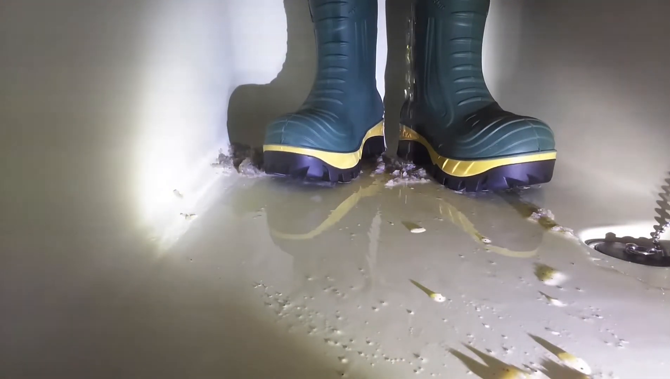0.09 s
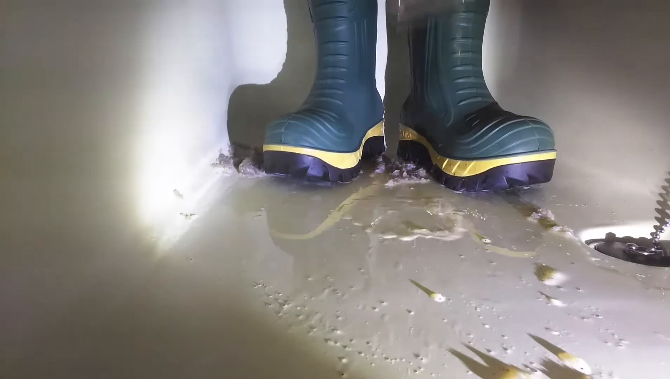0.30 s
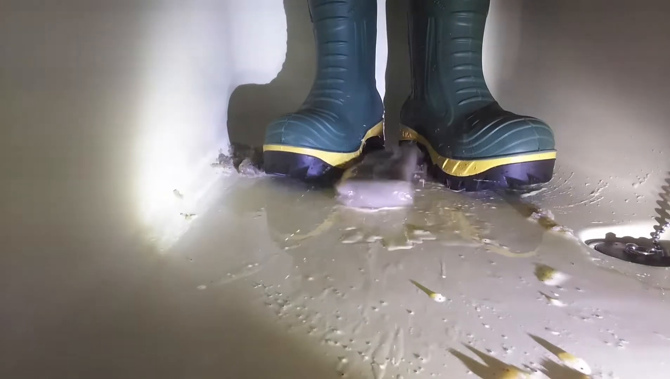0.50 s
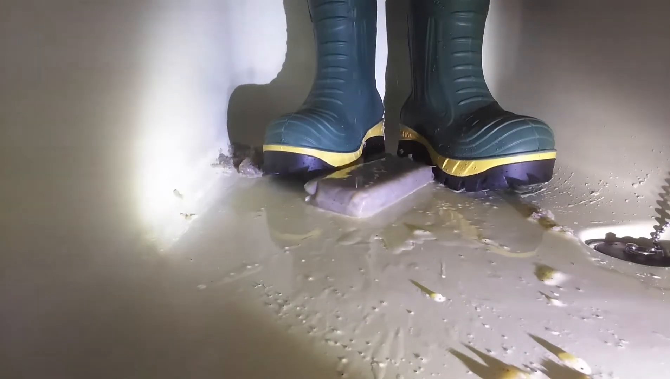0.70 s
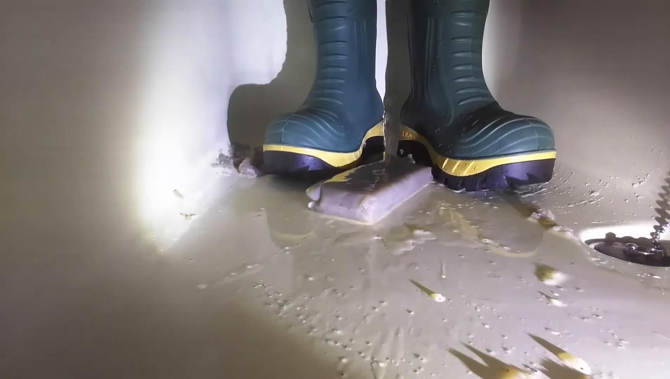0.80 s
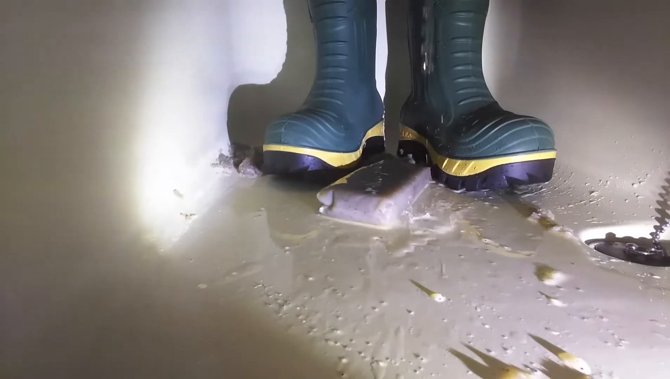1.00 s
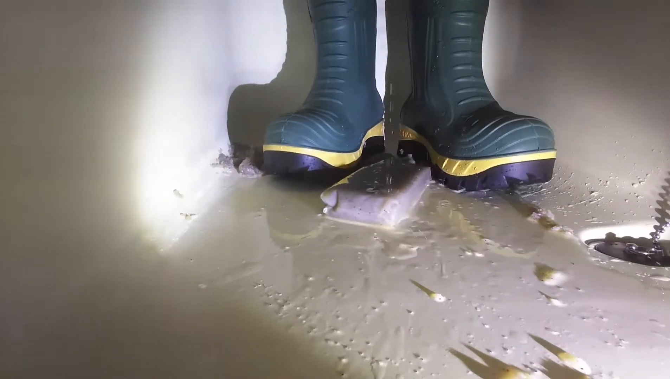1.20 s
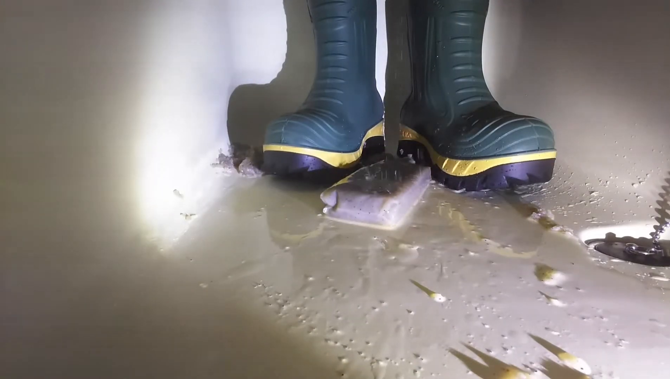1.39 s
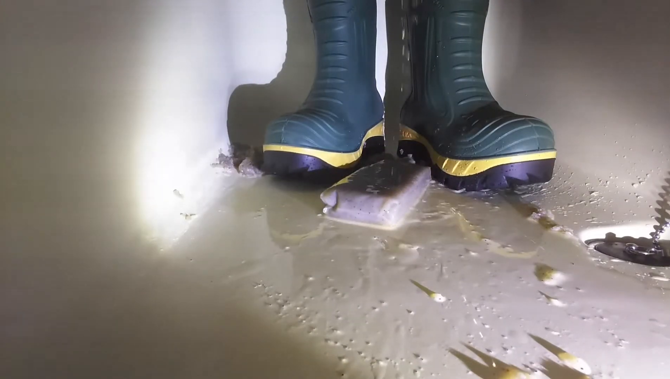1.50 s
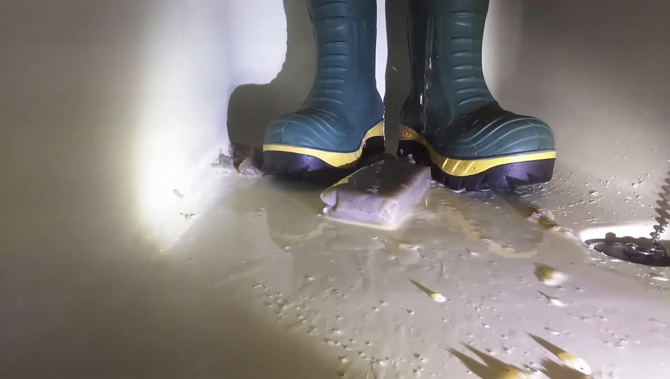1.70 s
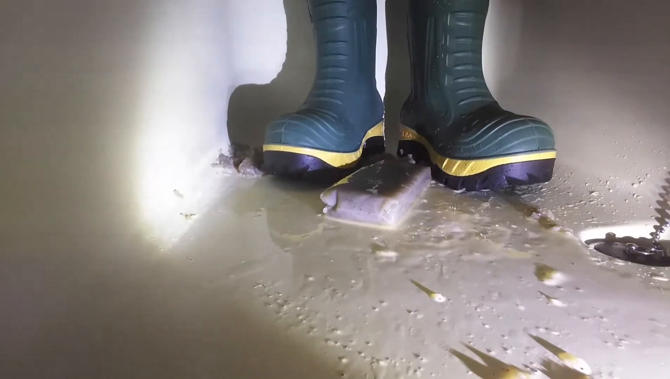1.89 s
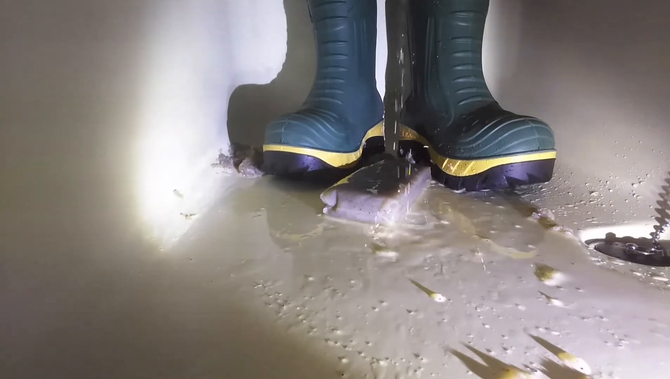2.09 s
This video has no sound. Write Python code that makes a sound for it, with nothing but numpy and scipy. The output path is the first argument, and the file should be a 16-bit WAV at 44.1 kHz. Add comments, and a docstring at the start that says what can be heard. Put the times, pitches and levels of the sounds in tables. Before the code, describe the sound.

After a near-quiet start, a wet lump lands in a quick cluster of hollow thuds, splats and squelching, then settles into sparse dribbles and tiny pops, heard very close from the tub floor in a reverberant bathroom.

```python
"""In a bathtub in a small tiled room, soft wet food drops between rubber boots.
Lumps thud on the thin tub floor and ring its modes; a block tumbles as a lumpy rolling force on the same modes.
Wet splats are crackly noise bursts, popping bubbles are short rising tones, squelching is a swarm of tiny rings.
Tub walls and room answer. Two close microphone ports listen from the tub floor, the right one peaking
in the treble, over a quiet room tone."""
import sys
import numpy as np
from scipy import signal
from scipy.fft import rfft, irfft, next_fast_len
from scipy.io import wavfile
from scipy.ndimage import map_coordinates

SR = 44100
rng = np.random.default_rng(int(sys.argv[2]) if len(sys.argv) > 2 else 0)


def to_wav(s):
    """Save 16-bit WAV."""
    ch = np.atleast_2d(s).T  # columns
    pcm = np.round(np.clip(ch, -1, 1) * 32767)  # PCM
    wavfile.write(sys.argv[1], SR, pcm.astype(np.int16))


def level_to_linear(level):
    """Convert decibel levels to linear amplitude factors, elementwise."""
    exponent = np.asarray(level, float) / 20
    return 10 ** exponent


N = 92610  # length in samples, 2.1 s

BOOM_UNDER_HZ = 130  # the tub's lowest modes lie below this
ROOM_TUB_DB, ROOM_WET_DB = -12, 3.5  # room gain for tub sounds and for wet sounds


def unit(x):
    """Scale to rms 1."""
    return x / np.sqrt(np.mean(x ** 2) + 1e-20)


def along(points, hz, order=1):
    """Read one column of (Hz, ..) points on a log frequency axis."""
    columns = np.transpose(points)
    return np.interp(np.log(hz + 1), np.log(columns[0] + 1), columns[order])


def filtered(x, response):
    """Multiply the spectrum of x by a response of frequency."""
    m = next_fast_len(x.shape[-1] + 8192)
    spectrum = rfft(x, m) * response(np.fft.rfftfreq(m, 1 / SR))
    return irfft(spectrum, m)[..., :x.shape[-1]]


def add(out, x, s, pan_db=0):
    """Mix x into out at time s, the left port pan_db above the right."""
    i = min(round(s * SR), N)
    panned = x * level_to_linear([[pan_db / 2], [-pan_db / 2]])
    out[..., i:i + x.shape[-1]] += panned[..., :N - i]


# Lumps landing on the tub floor, close to the ports. Each row: start in seconds, level in dB before
# the shared trim, contact in ms, extra boom of the lowest modes in dB.
LANDINGS = [(0.2195, -18.5, 1.38, -16), (0.2464, -18, 1.42, -1), (0.315, -32, 3.7, -2),
            (0.446, -14, 4.2, 20), (0.47, -12.5, 2.65, 6.5), (0.49, -12, 1.35, 11), (0.503, -22.5, 3.45, 9),
            (0.542, -8.5, 5.6, -6), (0.593, -13, 5.7, 7.5), (.5988, -6, .9, -4), (.611, -14, 0.98, -19),
            (0.621, -16.5, 1.4, 13), (0.677, -22, 1.23, -9), (0.719, -14, 2.87, -9.5), (.775, -25.5, 3, 4),
            (.91, -31.5, 0.55, 11.5), (.921, -39, 1, -14), (0.935, -34, 4.4, 12), (1.081, -30, 1.78, 6),
            (1.141, -29, 1.02, 1), (1.172, -34.5, 0.6, 7), (1.268, -37, 1.6, -2), (1.348, -30, 2.4, -10),
            (1.499, -40, 3.5, 1), (1.526, -30, 2.1, 3.5), (1.638, -29, 3.5, 7.5), (1.7937, -25, 2.06, 5),
            (1.804, -33, 4.8, 5), (1.821, -37, 1.06, 0), (1.86, -24, 1.08, -9), (1.871, -37, 0.68, -5),
            (1.878, -26, 0.99, -11), (1.894, -32, 1.4, -10), (1.922, -37, 1.9, 0), (1.988, -36.5, 2.3, -14),
            (2.086, -23.5, 0.97, -3)]


def thuds():
    """Each soft blow is a smooth push, heard directly and through the ringing of the tub floor."""
    out = np.zeros((2, N))
    trim_db = -6
    for s, db, contact_ms, boom_db in LANDINGS:
        push = np.hanning(max(int(contact_ms * SR / 1000), 4) + 2)
        tap = ring(spread_db=2, boom_db=boom_db)
        blow = signal.fftconvolve(tap, push[None] / push.sum(), axes=1)
        blow[:, :len(push)] += push
        gain = level_to_linear(db + trim_db)
        add(out, gain * blow, s)
        add(out, gain * room(blow.mean(0)[:SR // 3], ROOM_TUB_DB), s)
    return out


# The block tumbling and dribble drumming on the tub floor. Each row: time in seconds, level in dB
# before the shared trim, hardness as gain in dB above 500 Hz.
TUMBLING = [(0.2, -88, -4), (0.216, -50, -6), (0.224, -25, -2.5), (0.342, -24.5, -12), (.372, -27, 1.5),
            (0.422, -36, 4.5), (0.443, -21.5, -5), (0.458, -18.5, 2), (0.574, -25.5, -25),
            (0.601, -19.5, 6.5), (0.898, -52, -20), (0.936, -38, -19), (1.052, -50.5, -1), (1.082, -42, 5),
            (1.184, -31.5, 2.5), (1.322, -47, 5), (1.358, -39.5, 2.5), (1.455, -48.5, -4),
            (1.528, -41.5, 4.5), (1.606, -49, -4), (1.644, -39, 1), (1.786, -45.5, -17), (1.795, -33.5, 8),
            (1.855, -37, 3), (1.866, -40.5, 9.5), (1.93, -39, 3), (2.03, -37, 3.5), (2.1, -30, -8)]


def tumble():
    """A lumpy rolling force wanders between spots of the tub floor; the wet load damps their ring."""
    trim_db, boom_db, hard_over_hz = -6, -5, 500
    force_hz, lumpy_db = 450, 1.5  # corner of the force, random swing of its level
    spots, load_t60_s = 5, 0.12
    s, db, hard_db = np.transpose(TUMBLING)
    lumps = map_coordinates(rng.standard_normal(N // 600 + 4), [np.arange(N) / 600])
    force = filtered(rng.standard_normal(N), lambda hz: 1 / (1 + (hz / force_hz) ** 2))
    force = force * level_to_linear(lumpy_db * lumps)
    damping = level_to_linear(-60 * np.arange(SR // 4) / SR / load_t60_s)
    taps = [ring(spread_db=2)[:, :SR // 4] * damping for _ in range(spots)]
    # 40 random moments at which a new spot is drawn
    moves = N * np.sort(rng.random(40))
    spot = rng.integers(spots, size=41)[np.searchsorted(moves, np.arange(N))]
    roll = np.zeros((2, N))
    for k, tap in enumerate(taps):
        roll += signal.fftconvolve((force * (spot == k))[None], tap, axes=1)[:, :N]
    roll = unit(roll)
    t = np.arange(N) / SR
    deep = filtered(roll, lambda hz: 1 / (1 + (hz / BOOM_UNDER_HZ) ** 8))
    high = filtered(roll, lambda hz: 1 - 1 / (1 + (hz / hard_over_hz) ** 8))
    hardness = level_to_linear(np.interp(t, s, hard_db))
    roll = roll + deep * (level_to_linear(boom_db) - 1) + high * (hardness - 1)
    roll = roll * level_to_linear(np.interp(t, s, db, left=-120) + trim_db)
    return roll + room(roll.mean(0), ROOM_TUB_DB)[:, :N]


# Modes of the tub floor, reaching both ports alike. Each row: frequency in Hz before the wet load's shift,
# relative level in dB, t60 in seconds.
FLOOR_MODES = [(55.2, -20, 0.75), (102, -2, 0.28), (123, -13.5, 0.2), (167.8, -9.5, 0.67),
               (211.4, -4, 0.32), (247, -12.5, 0.23), (275.6, -9, 0.32), (322, -10.5, 0.35),
               (389.7, -5, 0.083), (414.4, -10, 0.28), (474.7, -16, 0.62), (563, -17.5, 0.57),
               (647, -18, 0.47), (771.4, -8.5, 0.33), (869, -14, 0.47), (951.5, -7, 0.15), (1100, -4, 0.05),
               (1300, -3, 0.05), (1600, -4, 0.03), (1950, 2, .04), (2375, 5, 0.06), ]
# Modes that rock across the ports, opposite in left and right. Each row: frequency in Hz before
# the shift, relative level in dB, t60 in seconds.
ROCKING_MODES = [(123, -39, 0.22), (172, -30, 0.18), (347, -19, 0.1), (426.6, -5.5, 0.58),
                 (425.4, -11.5, 0.093), (468, -9, 0.23), (511, -9.5, 0.31), (625, -14, 0.52),
                 (755, -12.5, 0.24), (828, -29, 0.21), (1030, -10.5, 0.079), (1260, -1.5, 0.13)]


def ring(spread_db, boom_db=0):
    """The tub's answer to a tap at both ports: decaying sines, weighted anew at each spot."""
    t = np.arange(SR) / SR
    detune = 0.012  # random share by which a wet load shifts each mode

    def ringing(modes):
        total = np.zeros(SR)
        for k, (hz, db, t60) in enumerate(modes):
            level_db = db + rng.normal(0, spread_db) + boom_db * (hz < BOOM_UNDER_HZ)
            shifted_hz = hz * (1 + detune * rng.normal())
            # neighbouring modes start with opposite sign
            total += (-1) ** k * level_to_linear(level_db - 60 * t / t60) * np.sin(2 * np.pi * shifted_hz * t)
        return total

    mid = ringing(FLOOR_MODES)
    side = ringing(ROCKING_MODES)
    return np.array([mid + side, mid - side]) / 3


# Wet slaps beside the ports. Each row: start in seconds, level in dB before the shared trim, decay time
# in ms, centre in Hz, fall-off under and over it in dB per octave, left over right in dB.
SLAPS = [(0.0944, -44, 19, 3220, 4, 3.5, 6), (0.2195, -23.5, 3.1, 1950, 4.1, 2.5, 4),
         (0.334, -39, 9, 2010, 8.5, 3, -2), (0.3568, -17, 4.2, 9700, 7.6, 4.1, -3),
         (0.4318, -32, 13, 2820, 5.1, 2.4, 6), (0.4468, -16.5, 7, 9400, 4.7, 2, -5),
         (0.4563, -10, 1.9, 2200, 4.5, 2, 3), (0.4672, -8.5, 2.7, 3560, 13, 2.3, 3),
         (.478, -18, 3.7, 2410, 13, 0.5, 0), (0.49, -23.5, 4.4, 4600, 8.1, 7, -3),
         (0.5849, -18.5, 4.8, 1940, 15, 1.7, -4), (0.596, -19.5, 7.4, 6100, 7.7, 9, 0),
         (0.8014, -28.5, 3.3, 12990, 10.4, 1, 0), (0.9084, -29, 3, 6910, 2, 2, -2),
         (0.9206, -28, 4.3, 6000, 1.7, -0.5, 12), (1.0672, -34, 2.9, 3900, 2.8, 1.5, -11),
         (1.0825, -20.5, 8.6, 3630, 14.2, 6.5, -9), (1.149, -37, 3.6, 6000, 5.5, 8, 16),
         (1.2565, -12.5, 1.1, 8150, 15, 10, 8.5), (1.49, -34.5, 0.7, 8560, 27, 4, -30),
         (1.514, -18, 2.6, 13700, 25.5, 1, -10), (1.526, -40.5, 2.5, 3640, 5.3, 3, 12),
         (1.6238, -21.5, 1.27, 2300, 4.8, -1.5, 11), (1.6365, -24, 3.2, 9600, 7.9, -4, -17),
         (1.697, -23.5, 2.1, 9500, 20, 3, -16), (1.7929, -22.5, 1.64, 7600, 10.7, 7, -2),
         (1.8588, -35.5, 7, 2500, 1.4, 3.5, 1), (1.877, -27, 4.8, 11000, 22, 6, 4),
         (1.947, -18.5, 4.95, 7100, 15.2, 7, -3), (2.0842, -15, 1.72, 3950, 2.7, 3, -2)]


def splats():
    """Each slap is a crackly burst of noise, partly different at each port; the room hears its smooth colour."""
    out, t = np.zeros((2, N)), np.arange(SR // 8) / SR
    trim_db, attack_s, crackle_db = -1.5, 0.0011, 3.5
    for s, db, ms, centre_hz, under_db, over_db, pan_db in SLAPS:
        def colour(hz):
            slope_db = np.where(hz < centre_hz, under_db, -over_db)
            return level_to_linear(np.log2((hz + 50) / centre_hz) * slope_db)

        noise = pair(rng.standard_normal((2, len(t))))
        # a new random gain every 30 samples
        crackle = np.repeat(rng.standard_normal(len(t) // 30 + 1), 30)[:len(t)]
        grit = noise * level_to_linear(crackle_db * crackle)
        envelope = np.exp(-t * 1000 / max(ms, 0.3)) * (1 - np.exp(-t / attack_s))
        slap = level_to_linear(db + trim_db) * unit(filtered(grit, colour)) * envelope
        add(out, slap, s, pan_db)
        add_walls(out, slap, s)
        add(out, echo(slap[0], colour), s)
    return out


# Bubbles bursting near the ports. Each row: start in seconds, level in dB before the shared trim,
# pitch reached in Hz, left over right in dB, life in cycles, pitch rise as a share.
BUBBLES = [(0.1336, -22, 6330, 1, 7.5, 0.2), (0.1625, -22, 5360, 13, 14.8, 0.37),
           (0.3591, -27, 10100, -10, 15, 0.047), (0.6, -16, 7100, 0, 8.7, 0.085),
           (0.9087, -16.5, 6650, 16, 4.8, 0.4), (1.0849, -20.5, 6070, 15, 22, 0.24),
           (1.0848, -17, 3890, 17.5, 15, 0.15), (1.0845, -24.5, 2720, 7.5, 12, .05),
           (1.2568, -24.5, 6100, 0, 11.5, 0.092), (1.2576, -23.5, 9200, -22, 10.7, 0.12),
           (1.6253, -38, 9800, -7, 11, 0.14), (1.6429, -30, 6740, -22, 9.2, 0.14),
           (1.6984, -13, 9440, -6, 8.7, 0.074), (1.948, -24.5, 6250, -39, 12, 0.13)]


def pops():
    """A bursting bubble rings briefly while its pitch climbs."""
    out, t = np.zeros((2, N)), np.arange(SR // 30) / SR
    trim_db, attack_s = -3, 0.0003
    smear_octaves = 0.11  # width of the colour in the room for a steady pitch
    for s, db, hz, pan_db, cycles, rise in BUBBLES:
        life = max(cycles, 1) / hz
        pitch = hz * (1 - rise * np.exp(-3 * t / life))
        tone = np.sin(2 * np.pi * np.cumsum(pitch) / SR)
        envelope = np.exp(-t / life - (t / life) ** 4) * (1 - np.exp(-t / attack_s))
        pop = level_to_linear(db + trim_db) * tone * envelope
        add(out, pop, s, pan_db)
        add_walls(out, pop, s)

        def colour(f):
            octaves = np.log2((f + 1) / (hz * (1 - rise / 4)))
            return 1 / (1 + (octaves / (smear_octaves + rise / 4)) ** 2)

        add(out, echo(pop, colour), s)
    return out


# Wet mass squelching under the tumbling block. Each row: time in seconds, level in dB before the trim.
SQUELCHING = [(0.33, -36), (0.352, -69), (0.361, -34), (0.378, -70), (0.426, -49), (0.452, -26.5),
              (0.474, -24), (0.514, -54.5), (0.57, -33), (0.602, -32), (0.635, -40.5), (0.7, -40)]


def squelch():
    """A swarm of tiny short-lived bubbles, each a decaying sine reaching the ports at slightly different times."""
    trim_db, per_s = -4, 600
    centre_hz, spread = 3530, 0.81 * 3.8  # spread: full range of pitch in natural log units
    s, db = np.transpose(SQUELCHING)
    draw = rng.random((int(per_s * (s[-1] - s[0])), 4))
    at = s[0] + draw[:, 0] * (s[-1] - s[0])
    hz = np.clip(centre_hz * np.exp(spread * (draw[:, 1:2] - 0.5)), 500, 14000)
    t = np.arange(160) / SR
    # cubing makes most bubbles quiet and a few loud
    grains = level_to_linear(24 * draw[:, 2:3] ** 3) * np.sin(2 * np.pi * hz * t) * np.exp(-t * hz / 2)
    place = (at * SR).astype(int)[:, None] + np.arange(160)
    lag = ((draw[:, 3:] - 0.5) * 40).astype(int)  # samples, opposite at the two ports
    swarm = np.array([np.bincount((place + k * lag).ravel(), grains.ravel(), N) for k in (1, -1)])
    active = swarm[:, round(s[0] * SR):round(s[-1] * SR)]
    level = level_to_linear(np.interp(np.arange(N) / SR, s, db) + trim_db)
    swarm = swarm / np.sqrt(np.mean(active ** 2)) * level
    return swarm + room(swarm[0], ROOM_WET_DB - 4.5)[:, :N]


# Tub walls a short way off, answering a wet sound. Each row: delay in ms, gain in dB.
TUB_WALLS = [(4.2, -11), (7.6, -10), (12.5, -7), (18.5, -13.5)]


def add_walls(out, x, s):
    """Delayed copies of a wet sound off the tub walls, each randomly panned."""
    for delay_ms, wall_db in TUB_WALLS:
        add(out, level_to_linear(wall_db) * x, s + delay_ms / 1000, rng.normal(0, 4))


# Decay of the small tiled room. Each row: frequency in Hz, t60 in seconds.
ROOM_DECAY = [(100, 0.27), (400, 1), (1000, 0.66), (2500, 0.42), (6000, 0.42), (9000, 0.32), (12000, 0.35)]


def room(x, level_db):
    """A fresh diffuse tail of noise, each band dying at its own speed."""
    gap_s = 0.0018  # silence before the tail
    hz, t, z = signal.stft(rng.standard_normal((2, SR // 2)), SR, nperseg=256)
    decay = level_to_linear(-60 * t / along(ROOM_DECAY, hz)[:, None])
    tail = pair(signal.istft(z * decay, SR, nperseg=256)[1])
    tail = tail / np.linalg.norm(tail[0]) * (np.arange(tail.shape[1]) > gap_s * SR)
    return level_to_linear(level_db) * signal.fftconvolve(x[None], tail, axes=1)


def echo(x, colour):
    """A room tail of a smooth colour, scaled from the energy of x."""
    tail = filtered(room(np.ones(1), 0), colour)
    return tail * np.linalg.norm(x) / np.linalg.norm(tail[0]) * level_to_linear(ROOM_WET_DB)


# Likeness of diffuse sound at the two ports. Each row: frequency in Hz, left-right correlation.
LIKENESS = [(100, 0.91), (250, 1), (400, 0.13), (1000, 0.23), (3000, 0.012)]


def pair(x):
    """Two unrelated noises mixed so that both ports hear the bass alike."""
    def mid_side(hz):
        angle = np.arccos(np.clip(along(LIKENESS, hz), -1, 1)) / 2
        return np.array([np.cos(angle), np.sin(angle)])

    mid, side = filtered(x, mid_side)
    return np.array([mid + side, mid - side])


# Colour of the room tone. Each row: frequency in Hz, relative density in dB per Hz.
ROOM_TONE = [(20, 3.5), (40, 4), (60, -2), (400, -8), (700, -14), (1500, -14.5), (3200, -18), (9500, -23),
             (11500, -27.5), (16000, -41)]


def hush():
    """Quiet room tone: steady coloured noise."""
    noise = pair(rng.standard_normal((2, N)))
    return level_to_linear(-53.5) * unit(filtered(noise, lambda hz: level_to_linear(along(ROOM_TONE, hz))))


# Response of the two close microphone ports on the tub floor. Each row: frequency in Hz, left gain
# in dB, right gain in dB, both before the bass cut.
PORT_GAINS = [(185, 2.5, 1.5), (527, 3.5, -0.5), (1590, 0.5, -0.5), (3730, 1, -0.5), (7800, -4, -3),
              (9020, -5, 5.5), (11130, -7.5, -11.5), (16200, -22, -24)]


def scene():
    """The tub sounds through the ports, which lose the deepest bass, over the room tone."""
    near = thuds() + tumble() + splats() + pops() + squelch()

    def ports(hz):
        ratio = 1j * hz / 68  # bass cut corner in Hz
        gains_db = [along(PORT_GAINS, hz), along(PORT_GAINS, hz, order=2)]
        return (ratio / (1 + ratio)) ** 2 * level_to_linear(gains_db)

    return filtered(near, ports) + hush()


def band_limit(x):
    """A steep low-pass at the top of the band."""
    return signal.sosfilt(signal.butter(12, 16470, fs=SR, output="sos"), x)


def record(dry):
    """The finished mix, with everything from 16.5 kHz up removed."""
    mix = filtered(dry, lambda hz: hz < 16500)
    return band_limit(mix)


dry = scene()
out = record(dry)
to_wav(out)
```